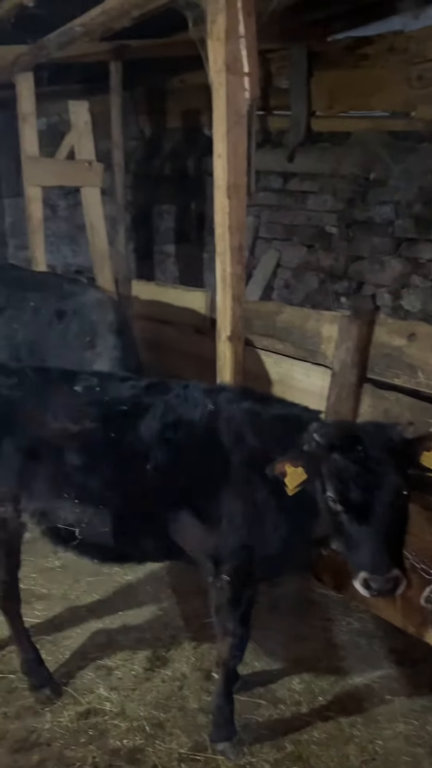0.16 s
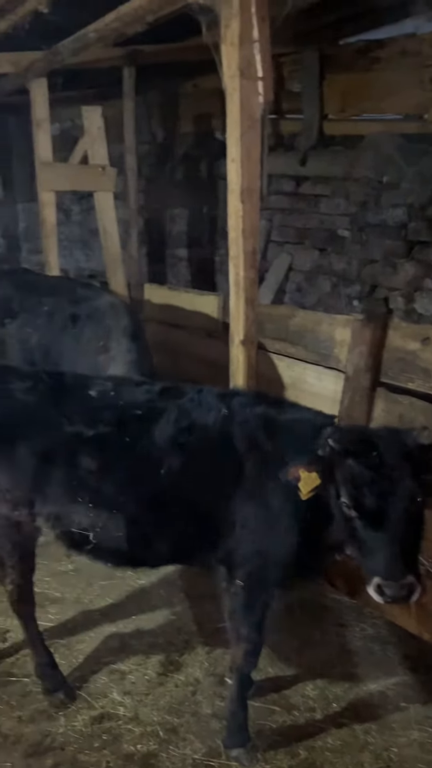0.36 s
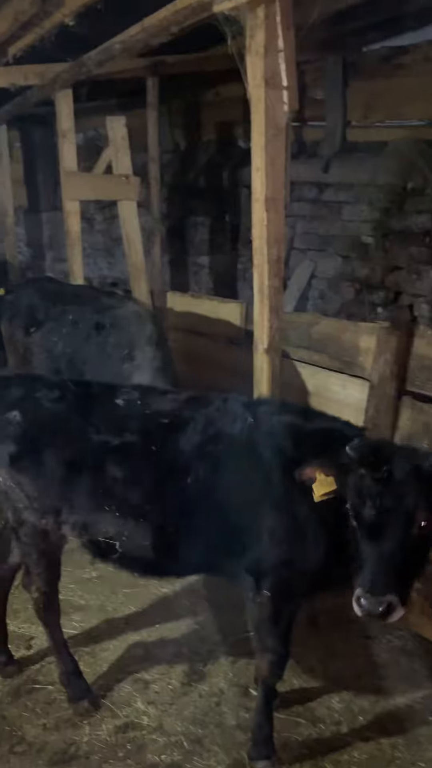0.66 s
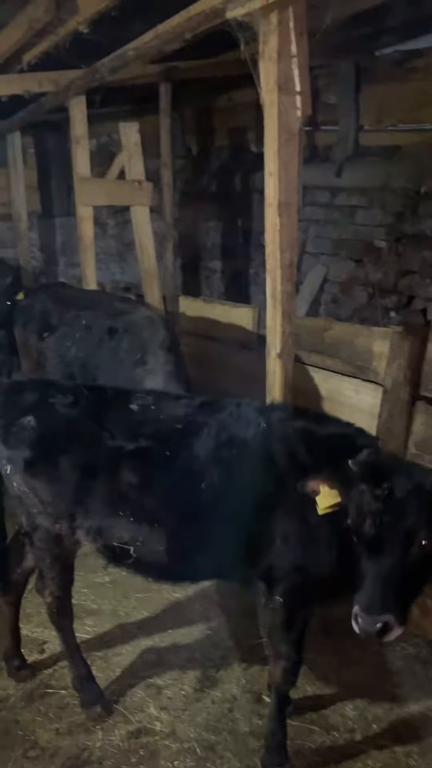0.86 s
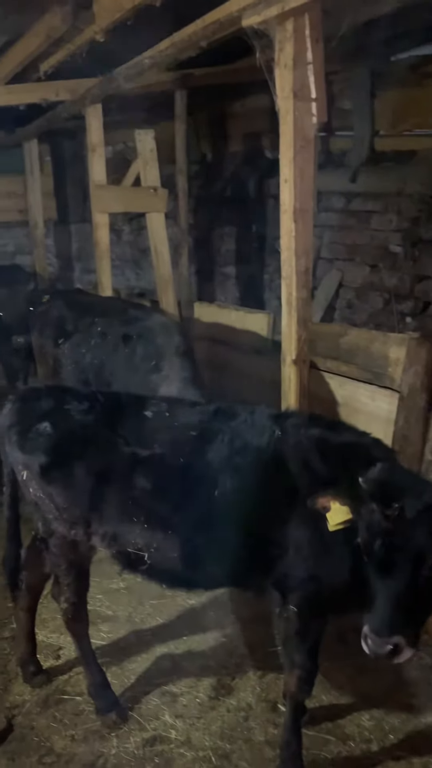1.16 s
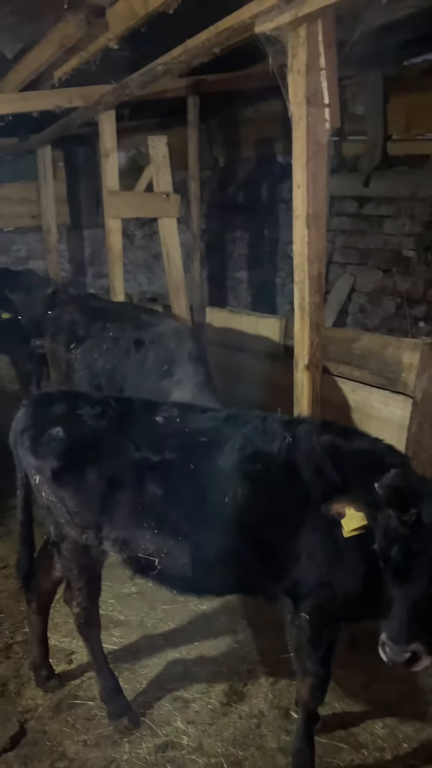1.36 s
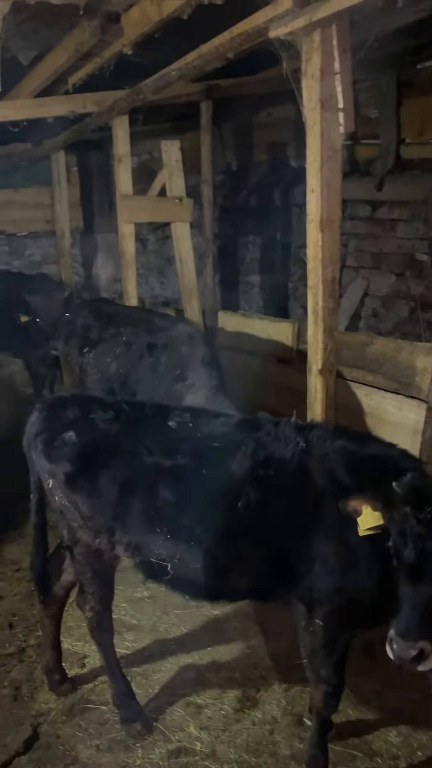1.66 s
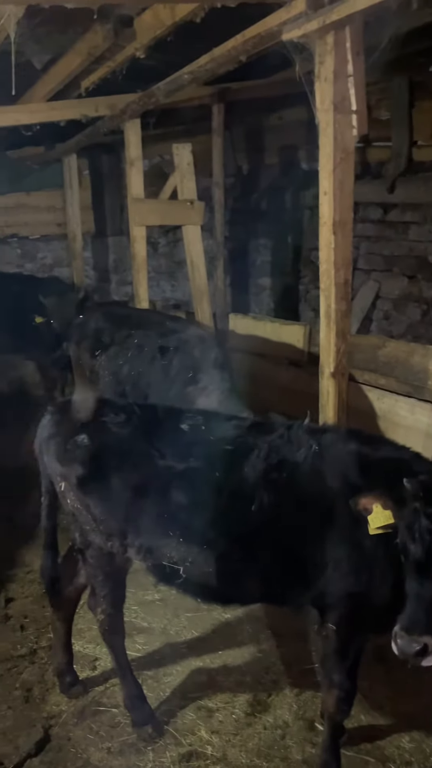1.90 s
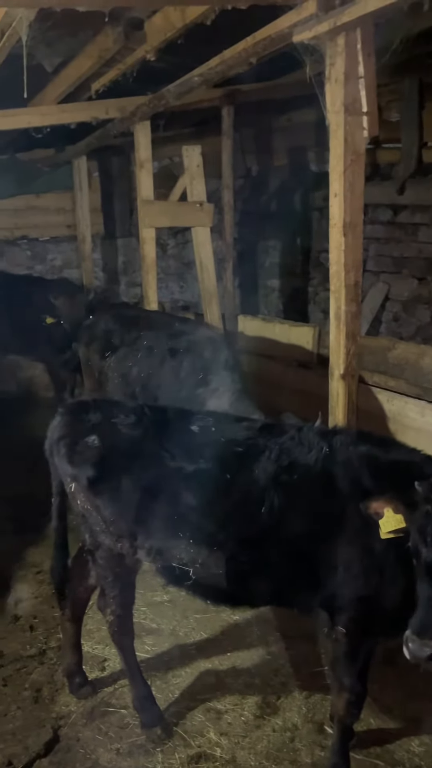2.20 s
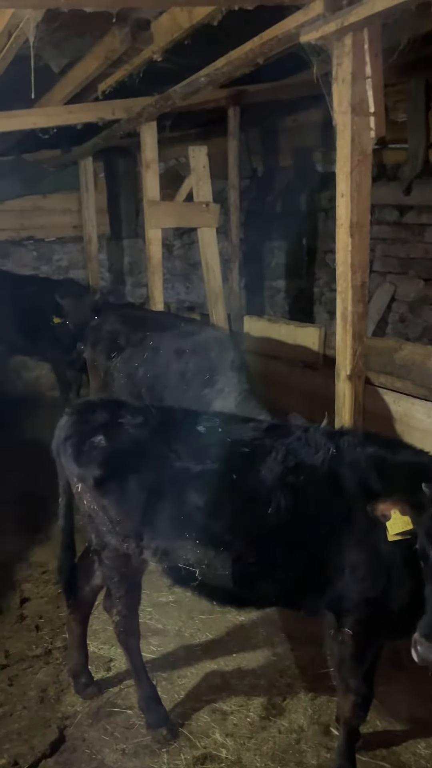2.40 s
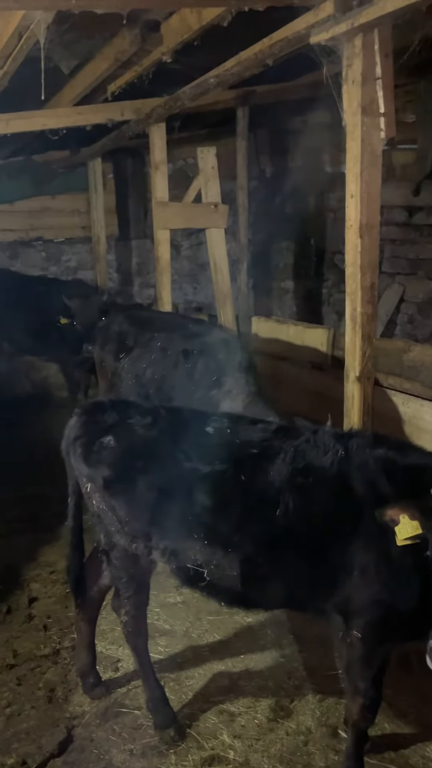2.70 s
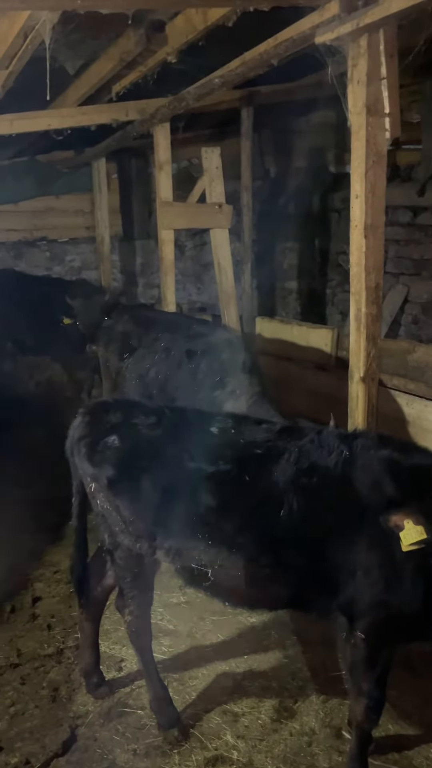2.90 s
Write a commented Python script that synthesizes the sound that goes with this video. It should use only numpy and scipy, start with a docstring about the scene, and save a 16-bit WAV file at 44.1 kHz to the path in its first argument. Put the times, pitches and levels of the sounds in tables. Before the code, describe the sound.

A heavy animal, probably a calf, rubs against wooden barn boards. Quiet low hum and a faint straw hiss come first, around 0.2 s. From 0.35 to 1.5 s a rough, hollow scraping surges unevenly, with many dull thuds. In the lull come soft low thuds near 1.75 s and a small woody knock at 1.86 s. A sudden bump at 2.1 s opens a stronger scrape, fading by 2.8 s into slight straw rustle.

```python
"""Rubbing against barn boards

In a timber barn something heavy, probably a calf, rubs and shoves along wooden boards in two long strokes.
Dense uneven slips drive resonances of frame and boards; bumps and decaying sines add blows, thuds and a knock.
Coloured impulses make the rustle of hair and straw, and coloured noise the low hum of the barn.
A phone with two close ports hears the bass nearly alike and the middle largely in opposite phase."""
import sys
import numpy as np
from scipy import signal
from scipy.fft import rfft, irfft, next_fast_len
from scipy.io import wavfile
from scipy.ndimage import uniform_filter1d, map_coordinates

SR = 44100
rng = np.random.default_rng(int(sys.argv[2]) if len(sys.argv) > 2 else 0)


def field_ratio(decibels):
    """Amplitude ratio for a level in dB (20 dB per decade); scalars and array-likes work."""
    return 10 ** (np.asarray(decibels, dtype=float) / 20)


def wav_out(sig):
    """Save sig, one row per channel (or a flat mono array), as 16-bit PCM at SR to the path in sys.argv[1]."""
    wavfile.write(sys.argv[1], SR, np.round(np.clip(np.atleast_2d(sig).T, -1, 1) * 32767).astype(np.int16))


N = 134505

# Course of the rubbing. Each row: time in seconds, then drive in dB of the boards, of their ring
# and of the rustle, each before the part's own level is added.
STROKES = [(0, -79, -67.5, -58), (.338, -87, -65.5, -65.5), (.345, -37.5, -45.5, -54),
           (.37, -32.5, -43, -61), (.415, -37.5, -47.5, -56), (.46, -47, -63, -63), (.58, -36, -49, -52),
           (.638, -42.5, -54.5, -60.5), (.645, -38, -39.5, -47), (.815, -39, -51, -57),
           (.825, -36, -37.5, -44), (.98, -32, -41, -51.5), (1.105, -42, -49.5, -50),
           (1.113, -39.5, -42, -55), (1.25, -36.5, -39.5, -47.5), (1.4, -35.5, -40, -51),
           (1.47, -42, -43, -55.5), (1.56, -63.5, -68, -68), (2.085, -65, -77, -106),
           (2.1, -30.5, -42.5, -62), (2.125, -34.5, -46.5, -100), (2.169, -38, -55, -82),
           (2.175, -30, -41.5, -52.5), (2.31, -33, -38.5, -45), (2.47, -32, -40.5, -50),
           (2.58, -33, -39, -46.5), (2.65, -42, -37.5, -51), (2.665, -42, -50, -54.5),
           (2.74, -47.5, -55, -54.5), (2.82, -67, -71, -65), (3.05, -72, -75, -63)]
# Resonances of the timber frame. Each row: centre in Hz, width in Hz, relative level in dB.
FRAME_MODES = [(58.7, 34, -14), (94, 17.7, -1.5), (157.2, 31, -8)]
# Resonances of the boards. Each row: centre in Hz, width in Hz, relative level in dB.
BOARD_MODES = [(193.2, 31, -2.5), (260.3, 27.3, 1.5), (313.7, 21.6, 0), (389, 53, -3), (516, 113.4, -7.5)]
# Upper resonances, the ring of the boards. Each row: centre in Hz, width in Hz, relative level in dB.
RING_MODES = [(711.3, 38.7, 5.5), (890, 63, 0.5), (1042.4, 46.4, -2.5), (1189, 327, -12.5)]
# Spectrum of the rustle. Each row: frequency in Hz, relative density in dB per Hz.
RUSTLE_SPECTRUM = [(700, 1.5), (1500, 3.5), (2300, 4), (3700, -3.5), (5500, -8), (8000, -10),
                   (11000, -20.5), (13000, -16), (13600, -47)]
# Bumps that open the strokes. Each row: start in seconds, peak level in dB.
BLOW_EVENTS = [(.366, -26), (2.099, -18)]
# Low thuds of the frame. Each row: time of the peak in seconds, peak level in dB, pitch at the peak in Hz.
THUD_EVENTS = [(.373, -21, 168), (.395, -26.5, 116), (0.485, -30, 118), (0.536, -28, 154),
               (.575, -19.5, 128.4), (.603, -18.5, 107), (0.657, -21.5, 161), (0.676, -23, 98.4),
               (0.751, -20, 94.8), (.845, -21, 97.6), (.875, -19, 157), (0.937, -20.5, 101.2),
               (1.044, -25, 108.5), (1.196, -25, 110), (1.244, -23, 101), (1.34, -22.5, 112.3),
               (1.389, -17.5, 103), (1.442, -25.5, 102), (1.721, -25.5, 78), (1.766, -26, 99.5),
               (2.111, -18, 161), (2.191, -31.5, 112), (2.251, -21.5, 120), (2.272, -19, 151),
               (2.324, -21, 101), (2.368, -26, 109), (2.415, -22, 105), (2.483, -27.5, 93.4),
               (2.605, -26.5, 91)]
# Small knocks. Each row: start in seconds, peak level in dB before the row weights, pitch in Hz.
KNOCK_EVENTS = [(1.863, -29, 890)]
# Swells of straw hiss. Each row: centre in seconds, half length in seconds, rms level at the crest in dB.
STRAW_SWELLS = [(0.19, 0.11, -54.5), (2.923, 0.047, -55)]
# Spectrum of the straw. Each row: frequency in Hz, relative density in dB per Hz.
STRAW_SPECTRUM = [(3000, -14), (5500, -9.5), (12500, -12), (14000, -32)]
# Spectrum of the barn's hum. Each row: frequency in Hz, relative density in dB per Hz.
BARN_SPECTRUM = [(25, -51), (45, 2.5), (90, -3), (250, -3), (800, -13.5), (1500, -29), (16000, -38.5)]
# Left channel against right, by frequency. Each row: frequency in Hz, level in dB, phase in radians,
# likeness from 0 to 1.
LEFT_AGAINST_RIGHT = [(62.6, -1.1, 0.07, 1), (231, -6.5, 0.5, 0.92), (363, -10, -1.52, 0.82),
                      (637, -4, -2.5, 0.87), (972, -2.5, -4, 1), (1545, -2, -3, 0.21),
                      (3260, -1.6, -4, 0.85), (6160, -3, -5, 0.22), (9070, 1.5, -3, 0.92),
                      (10650, -1.5, -3, 1), (12440, 4, -2.5, 0.64), (13400, -21, 3, 0)]


def unit(x):
    """Normalisation to an rms of 1."""
    return x / np.sqrt(np.mean(x ** 2) + 1e-20)


def along(points, hz):
    """Interpolation of (Hz, value) points on a logarithmic frequency axis."""
    f, v = np.transpose(points)
    return np.interp(np.log(hz + 1), np.log(f + 1), v)


def curves(rows):
    """Linear interpolation in time: one value per sample for each column after the first."""
    seconds, *columns = np.transpose(rows)
    return [np.interp(np.arange(N) / SR, seconds, column) for column in columns]


def wobble(knots_per_s):
    """Smooth random fluctuation: a spline through normal random knots."""
    knots = rng.standard_normal(int(N * knots_per_s / SR) + 4)
    return map_coordinates(knots, [np.arange(N) * knots_per_s / SR])


def filtered(x, response):
    """Linear filtering: the spectrum is multiplied by a complex response of frequency."""
    m = next_fast_len(N + SR // 2)
    return irfft(rfft(x, m) * response(np.fft.rfftfreq(m, 1 / SR)), m)[..., :N]


def resonant(modes):
    """Modal superposition: damped resonances of alternating sign add up to one response."""
    def response(f):
        total = 0
        for k, (centre, width, db) in enumerate(modes):
            damping = 1j * f * width
            total = total + (-1) ** k * field_ratio(db) * damping / (centre * centre - f * f + damping)
        return total
    return response


def coloured(spectrum):
    """Spectral shaping by a real response read from (Hz, dB) points."""
    return lambda f: field_ratio(along(spectrum, f))


def slips(per_s, spread_db):
    """Stick-slip friction as impulses of uneven size at chance times, with separate signs in the two rows."""
    hit = (rng.random(N) < per_s / SR) * field_ratio(spread_db * rng.standard_normal(N))
    return hit * rng.choice([-1, 1], (2, N))


def patchy(x, depth_db):
    """Uneven colour: random gain in time-frequency patches near 100 Hz by 60 ms."""
    z = signal.stft(x, nperseg=1024)[2]
    field = rng.standard_normal(z.shape[1:])
    field = uniform_filter1d(field, size=2, axis=0)  # over frequency
    field = uniform_filter1d(field, size=5, axis=1)  # over time
    return signal.istft(z * field_ratio(depth_db * unit(field)), nperseg=1024)[1][:, :N]


def rubbing():
    """Friction excitation: slips under the strokes drive the frame, the boards, their ring and the rustle."""
    judder_db, judder_per_s = 1.1, 30  # unevenness of the pressure, shared by all parts
    patch_db = 3.5
    boards, ring, rustle = field_ratio(curves(STROKES) + judder_db * wobble(judder_per_s))
    # drive, slips per second, spread of their sizes in dB, level over the drive in dB, response
    parts = [(boards, 540, 2.2, 1, resonant(FRAME_MODES)),
             (boards, 1500, 2.54, 3.62, resonant(BOARD_MODES)),
             (ring, 2500, 1.1, 8.37, resonant(RING_MODES)),
             (rustle, 6000, 2.6, 4.2, coloured(RUSTLE_SPECTRUM))]
    out = np.zeros((2, N))
    for drive, per_s, spread_db, level_db, response in parts:
        driven = filtered(slips(per_s, spread_db), response)
        out += field_ratio(level_db) * drive * unit(patchy(driven, patch_db))
    return out


def blows():
    """Impulse response: each bump rings one board resonance and the lowest of the upper ones."""
    ring_db = -11  # gain on the upper resonance
    hit = np.zeros(N)
    for start, db in BLOW_EVENTS:
        hit[round(start * SR)] = field_ratio(db)
    board, ring = resonant(BOARD_MODES[2:3]), resonant(RING_MODES[:1])
    body = lambda f: board(f) + field_ratio(ring_db) * ring(f)
    peak = np.abs(filtered(np.arange(N) == 0, body)).max()
    return filtered(hit, body) / peak * np.ones((2, 1))


def thuds():
    """Transient oscillation: at hard shoves the frame booms with a soft swell and fall and a sagging pitch."""
    rise_cycles, fall_cycles = 1.41, 2.46  # to 1/e of the peak
    sag_per_s = 3.9  # fraction of the pitch lost per second
    t = np.arange(N) / SR
    out = np.zeros(N)
    for peak_s, db, hz in THUD_EVENTS:
        u = t - peak_s
        shape = np.exp(-(u * hz / np.where(u < 0, rise_cycles, fall_cycles)) ** 2)
        cycles = hz * u * (1 - sag_per_s * u / 2) + rng.random()
        out += field_ratio(db) * shape * np.sin(2 * np.pi * cycles)
    return np.array([out, out])


def knocks():
    """Damped oscillation: a short tick with a soft onset and exponential decay."""
    decay_cycles = 19  # to fall by 60 dB
    out, t = np.zeros(N + SR), np.arange(SR // 3) / SR
    for start, db, hz in KNOCK_EVENTS:
        shape = (1 - np.exp(-(t * hz / 2) ** 2)) * field_ratio(-60 * t * hz / decay_cycles)
        tone = np.sin(2 * np.pi * (hz * t + rng.random()))
        out[round(start * SR):][:len(t)] += field_ratio(db) * shape / shape.max() * tone
    # weak and inverted in the right channel, strong in the left channel's own part
    return np.array([[-.4], [1.6]]) * out[:N]


def straw():
    """Many small impacts: dense coloured impulses give the fine hiss of shifted straw in soft swells."""
    t = np.arange(N) / SR
    level = sum(field_ratio(db) * np.exp(-((t - centre) / half) ** 2) for centre, half, db in STRAW_SWELLS)
    return level * unit(filtered(slips(12000, 2), coloured(STRAW_SPECTRUM)))


def barn():
    """Diffuse background: coloured noise, independent in the two rows, hums low and wavers in level."""
    level_db = -49 + 3.0 * wobble(8.03)
    noise = rng.standard_normal((2, N))
    return field_ratio(level_db) * unit(filtered(noise, coloured(BARN_SPECTRUM)))


def scene():
    """Superposition: row 0 is the sound of the right channel, row 1 the part that only the left receives."""
    return rubbing() + blows() + thuds() + knocks() + straw() + barn()


def top_cut(x):
    """Nothing passes above the cut-off."""
    return signal.sosfilt(signal.butter(12, 15640, fs=SR, output="sos"), x)


def record(dry):
    """Partial coherence: the left channel shares part of the right's sound, turned in phase and shaded."""
    top_hz, mono_hz, low_cut_hz = 15640, 13300, 20.5  # above mono_hz both channels are one
    hz, db, rad, like = np.transpose(LEFT_AGAINST_RIGHT)
    read = lambda values, f: along(np.transpose([hz, values]), f)

    def to_left(f):
        share = np.clip(read(like, f), 0, 1)
        turn = field_ratio(read(db, f)) * np.exp(1j * read(rad, f))
        return turn * [share, np.sqrt(1 - share ** 2)]

    def limits(f):
        low_cut = f ** 2 / (f ** 2 + low_cut_hz ** 2)
        return np.array([f < top_hz, f < mono_hz]) * low_cut

    right = dry[0]
    left = filtered(dry, to_left).sum(axis=0)
    mid, side = filtered(np.array([left + right, left - right]) / 2, limits)
    return top_cut(np.array([mid + side, mid - side]))


dry = scene()
out = record(dry)
wav_out(out)
```